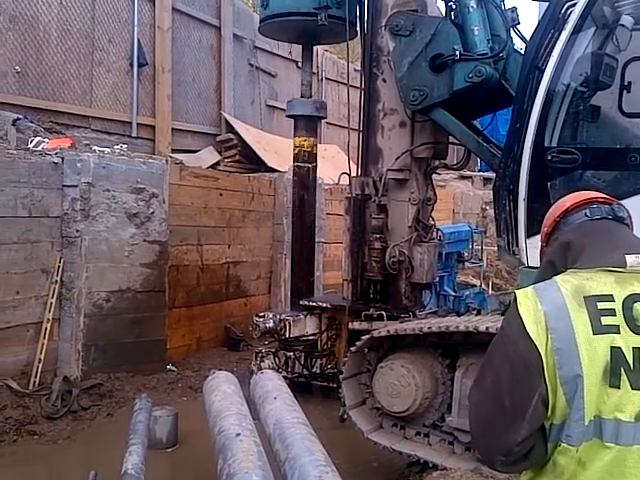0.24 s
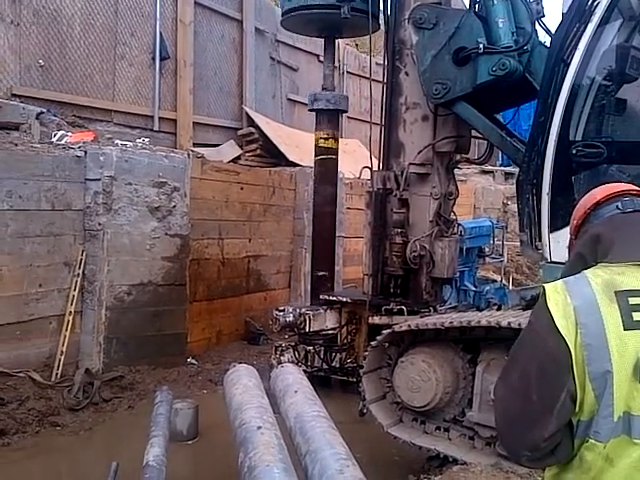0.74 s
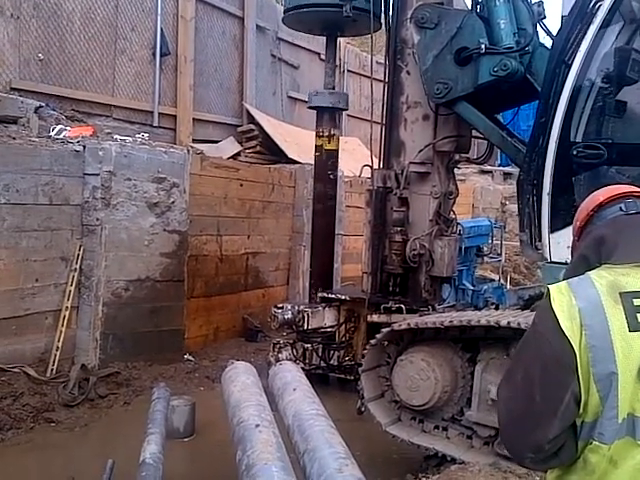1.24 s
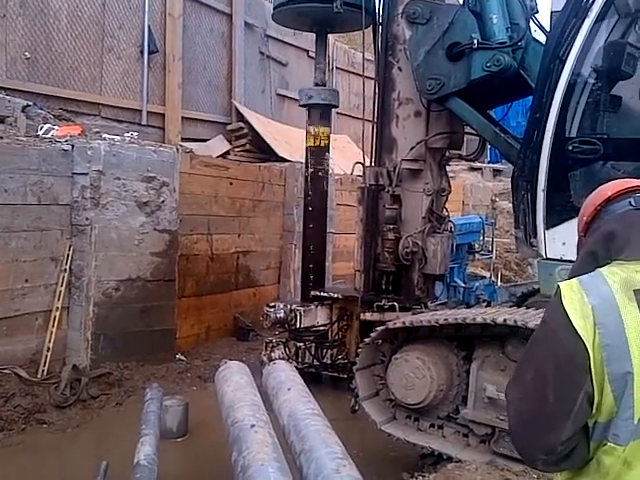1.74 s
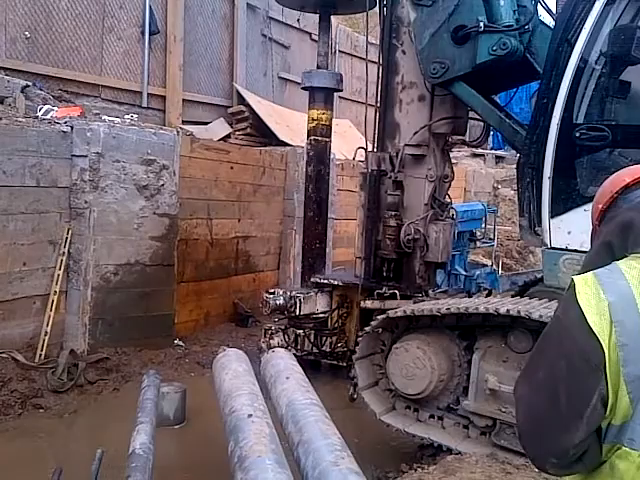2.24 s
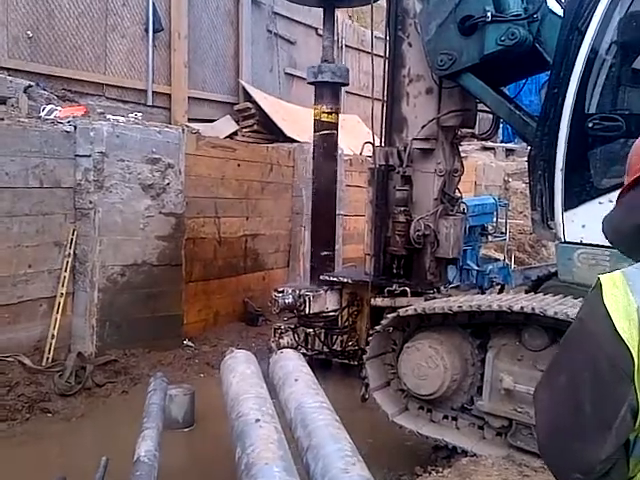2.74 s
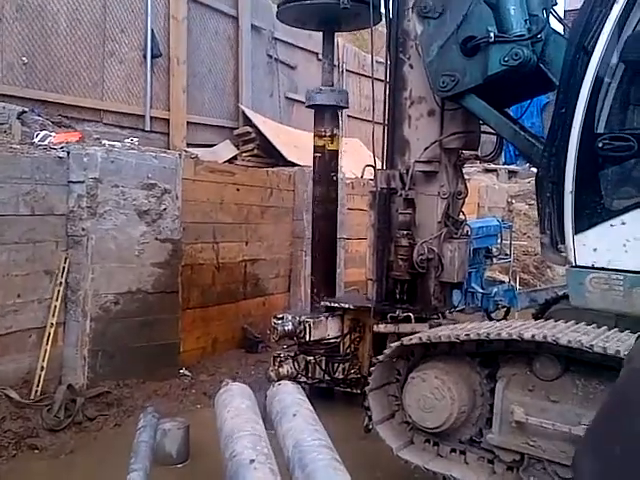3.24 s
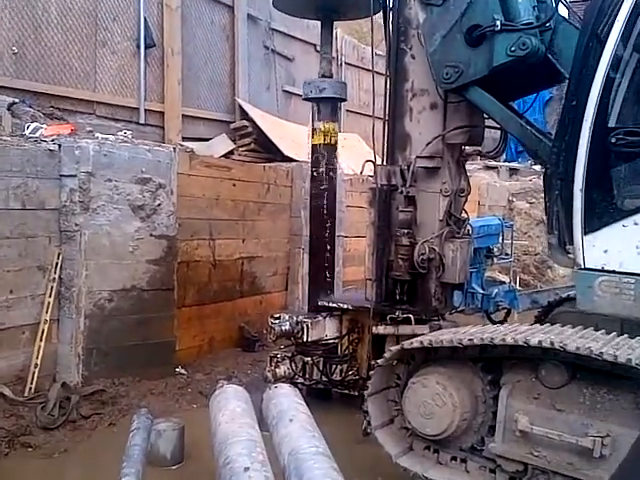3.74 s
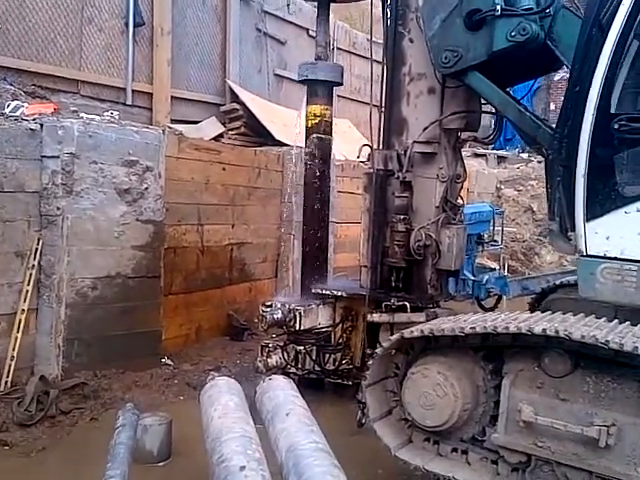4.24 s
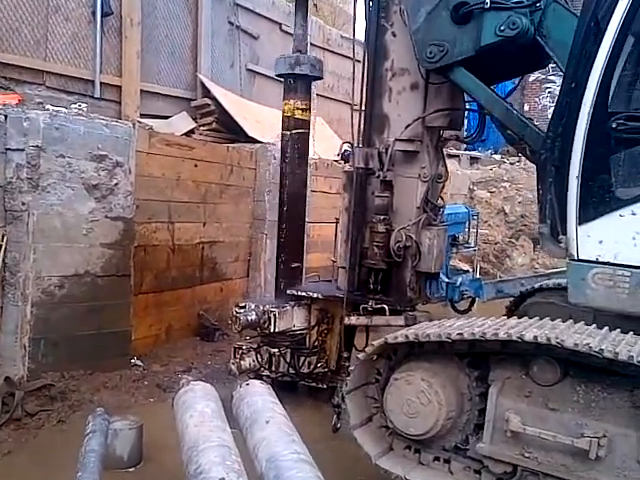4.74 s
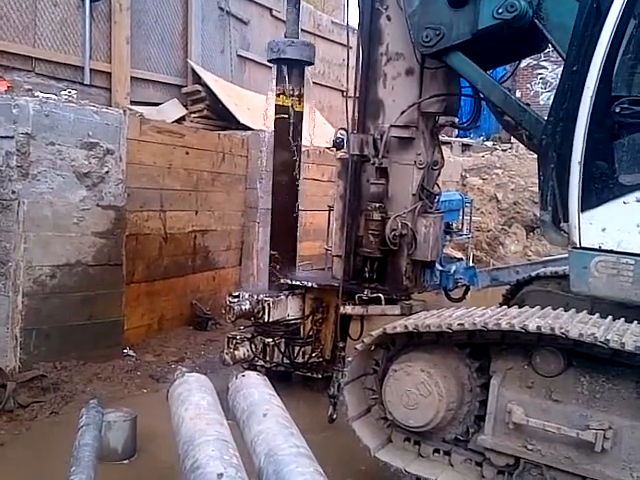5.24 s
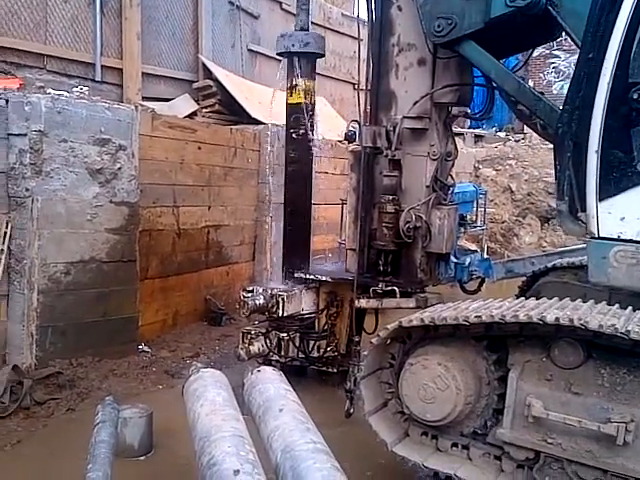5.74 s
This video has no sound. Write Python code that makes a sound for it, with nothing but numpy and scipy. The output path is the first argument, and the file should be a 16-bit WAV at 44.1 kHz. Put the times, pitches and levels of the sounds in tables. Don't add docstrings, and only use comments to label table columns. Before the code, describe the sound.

Constant, extremely loud engine and drill drone, without start or stop. Low firing tone, throbbing rotary head and midrange pump whine blend with broadband rumble and uneven rock crunching. Faint air hiss puffs are almost masked. From about four seconds the bass hum swells and dominates. Heard close in an excavation pit through a badly clipping phone, dense and rough.

```python
import sys
import numpy as np
from scipy import signal
from scipy.io import wavfile

SR = 44100
rng = np.random.default_rng(int(sys.argv[2]) if len(sys.argv) > 2 else 0)


def output_pcm(signal):
    pcm = np.clip(np.atleast_2d(signal).T, -1, 1) * 32767
    wavfile.write(sys.argv[1], SR, np.round(pcm).astype(np.int16))


N = 263718


def diesel():
    firing_hz, octave_lag_rad = 93.8, 2.5
    crank = turning(firing_hz * speed(), wobble_rad=0.12)
    first = tone(crank, -15.5 + 8.5 * boom(), flutter_db=0.35)
    octave = tone(2 * crank - octave_lag_rad, -13.5 - 2 * boom(), flutter_db=1.2)
    return first + octave


def speed():
    turn_s, first_ease_s, ease_s, run_ahead = 2.08, 1.25, 0.13, 0.0045
    time_s = np.arange(N) / SR
    from_ease_s = (time_s - first_ease_s + turn_s / 2) % turn_s - turn_s / 2
    return 1 + run_ahead * np.exp(-0.5 * (from_ease_s / ease_s) ** 2)


# start_s, share (0 to 1)
BOOM_DEPTH = [(0, 0.1), (1.2, 0.17), (2.2, 0.22), (3.0, 0.37), (4.0, 0.63), (4.6, 0.84), (5.2, 1),
              (5.98, 0.97)]


def boom():
    return in_time(BOOM_DEPTH)[0]


def rotor(pitch_hz, level_db, boom_gain_db, wobble_rad):
    angle = turning(pitch_hz * speed(), wobble_rad)
    return tone(angle, level_db + boom_gain_db * boom(), flutter_db=0.82)


def fan():
    return rotor(273.3, -11.5, -1.04, wobble_rad=0.17)


def rotary_head():
    return rotor(42.64, -19.5, 1.5, wobble_rad=0.033)


def gears():
    return rotor(438.2, -24, 1, wobble_rad=0.17)


# middle_s, half_width_s, level_db (rms)
WHINE_FIRST = [(.13, 0.13, -18.5), (.8, 0.23, -21), (2.0, 0.19, -19.5), (2.7, 0.15, -20), (4.0, 0.071, -23),
               (4.55, 0.19, -18.5), (5.6, 0.58, -28)]
WHINE_SECOND = [(.4, 0.15, -27), (1.3, 0.1, -23.5), (2.0, 0.19, -27), (2.65, 0.1, -24.5), (3.5, 0.33, -29),
                (5.0, 0.093, -21.5), (5.45, 0.091, -22.5), (5.75, 0.06, -23)]
WHINE_THIRD = [(.2, 0.18, -26.5), (.8, .12, -29.5), (1.2, 0.05, -34), (1.6, 0.084, -26.5), (2.2, 0.23, -26),
               (3.15, 0.086, -26.5), (3.6, 0.071, -30), (4.4, 0.21, -27.5)]
# multiple (of the piston pitch), level_db (rms)
WHINE_UPPER = [(4, -41), (5, -41), (6, -57)]


def pump():
    piston_hz, floor_db = 501.7, -40.5
    shaft = turning(piston_hz * speed(), wobble_rad=0.11)
    levels_db = [swells(rows, floor_db) for rows in (WHINE_FIRST, WHINE_SECOND, WHINE_THIRD)]
    levels_db += [level_db for multiple, level_db in WHINE_UPPER]
    return sum(tone((k + 1) * shaft, level_db, flutter_db=2.5) for k, level_db in enumerate(levels_db))


# pitch_hz, level_db (per Hz)
RUMBLE_COLOUR = [(25, -9.5), (60, -1.5), (130, -1.5), (250, -2.5), (420, -4), (700, -11.5), (1200, -33.5)]


def rumble():
    return from_db(-13.5 + 0.4 * boom()) * banded_noise(RUMBLE_COLOUR, patchy_db=1.75)


# pitch_hz, level_db (per Hz)
GRIND_COLOUR = [(300, -15), (600, 1.5), (1000, -1.5), (1500, -5), (2200, -11.5), (3200, -34), (5000, -30.5),
                (8000, -35.5), (11000, -36.5)]
# middle_s, half_width_s, level_db (rms)
GRIND_SWELLS = [(.03, .05, -27), (.17, 0.037, -27.5), (.78, 0.046, -20.5), (1.55, .06, -21.5),
                (2.6, 0.035, -24), (2.92, .04, -23), (3.1, 0.022, -20), (3.2, .03, -21), (3.4, 0.049, -23.5),
                (3.62, .06, -24), (4.0, 0.063, -24.5), (4.38, .07, -22), (4.7, 0.038, -27), (5.1, 0.044, -26),
                (5.9, 0.044, -23)]


def grind():
    level_db = swells(GRIND_SWELLS, floor_db=-21) + 1.6 * boom()
    return from_db(level_db) * banded_noise(GRIND_COLOUR, patchy_db=0.86)


# start_s, pitch_hz, peak_db, fade_s (time to fall 60
# dB)
KNOCKS = [
    (3.08, 1450, -8.5, 0.15),
    (6, 1400, 5.5, 0.049),
    (3.1, 1000, -13, .06),
    (5.4, 1000, 0, 0.077),
    (2.9, 130, -8.5, 0.4),
]


def knocks():
    out, rise_s = np.zeros(N), 0.007
    for start_s, pitch_hz, peak_db, fade_s in KNOCKS:
        t = np.maximum(np.arange(N) / SR - start_s, 0)
        fade = from_db(peak_db - 60 * t / fade_s)
        swell = 1 - np.exp(-t / rise_s)
        out += fade * swell * np.sin(2 * np.pi * pitch_hz * t)
    return out


# pitch_hz, level_db (per Hz)
AIR_COLOUR = [(8000, -17), (11000, -8), (13500, -3), (15500, 1), (17500, -10)]
# middle_s, half_width_s, level_db (rms)
AIR_PUFFS = [(.88, .08, -46), (1.25, .06, -46), (1.53, .04, -43), (1.93, .04, -46), (2.7, .1, -50),
             (2.92, .05, -46), (3.13, .06, -47), (4.1, .1, -49), (4.47, .05, -45), (4.75, .08, -45),
             (4.93, 0.041, -44), (5.04, .035, -40), (5.3, .06, -44), (5.46, .03, -44), (5.72, .03, -44),
             (5.9, 0.035, -47)]


def air():
    return from_db(swells(AIR_PUFFS, floor_db=-49.5)) * banded_noise(AIR_COLOUR, patchy_db=1.2)


def from_db(db):
    return 10 ** (np.asarray(db) / 20)


def rms_one(x):
    return x / np.sqrt(np.mean(x ** 2) + 1e-20)


def in_time(rows):
    start_s, *columns = np.transpose(rows)
    return [np.interp(np.arange(N) / SR, start_s, column) for column in columns]


def swells(rows, floor_db):
    t = np.arange(N) / SR
    power = from_db(2 * floor_db)
    for middle_s, half_width_s, level_db in rows:
        power = power + from_db(2 * level_db) * np.exp(-0.5 * ((t - middle_s) / half_width_s) ** 2)
    return 10 * np.log10(power)


def drift(rate_hz):
    r = np.exp(-80 * np.pi * rate_hz / SR)
    white = rng.standard_normal(N // 40 + 2002)
    slow = signal.lfilter([1], [1, -2 * r, r * r], white)[2000:]
    return np.interp(np.arange(N) / 40, np.arange(len(slow)), rms_one(slow))


def turning(pitch_hz, wobble_rad):
    return 2 * np.pi * np.cumsum(pitch_hz) / SR + wobble_rad * drift(8.2)


def tone(angle, level_db, flutter_db):
    strength = np.sqrt(2) * from_db(level_db + flutter_db * drift(11.3))
    return strength * np.sin(angle)


def banded_noise(colour, patchy_db):
    pitch_hz, colour_db = np.transpose(colour)
    count = round(2 * np.log2(pitch_hz[-1] / pitch_hz[0])) + 1
    edges = np.geomspace(pitch_hz[0], min(pitch_hz[-1], 0.45 * SR), count + 1)
    together, white = drift(9.9), rng.standard_normal((2, N))
    out = np.zeros(N)
    for k, (low, high) in enumerate(zip(edges, edges[1:])):
        band_filter = signal.butter(2, [low, high], "band", fs=SR, output="sos")
        band = signal.sosfilt(band_filter, white[k % 2])
        level_db = np.interp(np.log(low * high) / 2, np.log(pitch_hz), colour_db)
        flicker_db = patchy_db * (0.94 * together + drift(9.2))
        out += from_db(level_db + flicker_db) * band
    return rms_one(out)


def scene():
    tones = diesel() + fan() + rotary_head() + gears() + pump()
    noises = rumble() + grind() + knocks() + air()
    return (tones + noises)[None]


def overload(dry):
    drive_db, ceiling, bias, knee = 8.5, 0.71, -0.018, 16.5
    hot = (from_db(drive_db) * dry + bias) / ceiling
    return ceiling * hot / (1 + np.abs(hot) ** knee) ** (1 / knee)


# pitch_hz, level_db (per Hz)
ROUGH_COLOUR = [(40, -6), (150, 0), (500, -4), (1500, -12), (3000, -19), (6000, -31), (10000, -36),
                (16000, -38)]


def roughness():
    clean = 0.5 + 0.5 * np.tanh(4 * (drift(14.4) - 0.7 + 1.1 * boom()))
    level_db = -26 + 2.5 - 4 * boom() - 14 * clean
    return from_db(level_db) * banded_noise(ROUGH_COLOUR, patchy_db=2.5)


def trim_treble(x):
    shelf_hz, cut_hz = 15300, 15830
    top = signal.sosfiltfilt(signal.butter(40, shelf_hz, "high", fs=SR, output="sos"), x)
    shelved = x - 0.68 * top
    return signal.sosfiltfilt(signal.cheby2(24, 40, cut_hz, fs=SR, output="sos"), shelved)


def low_pass(x):
    return signal.sosfilt(signal.butter(12, 16450, fs=SR, output="sos"), x)


def record(dry):
    limit = 0.708
    limited = np.clip(overload(dry) + roughness(), -limit, limit)
    finished = trim_treble(limited)
    return low_pass(finished)


dry = scene()
out = record(dry)
output_pcm(out)
```